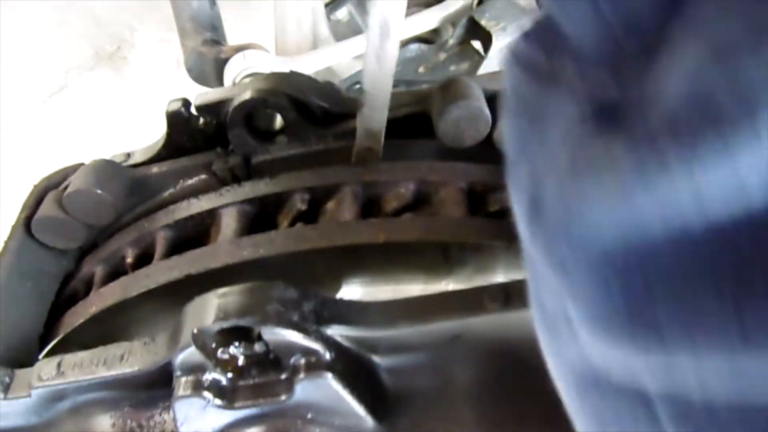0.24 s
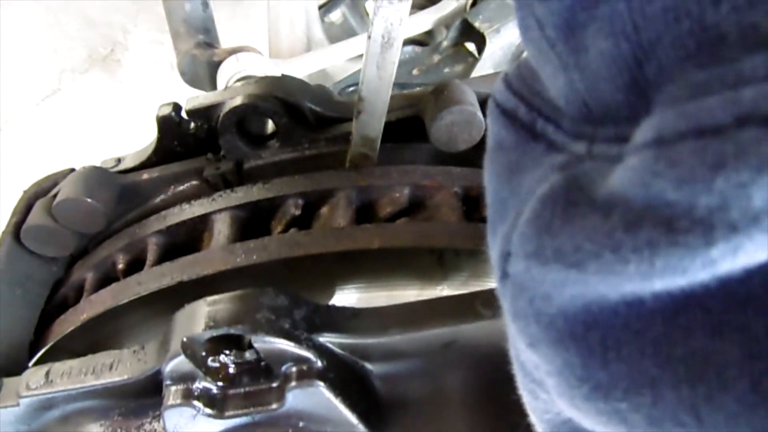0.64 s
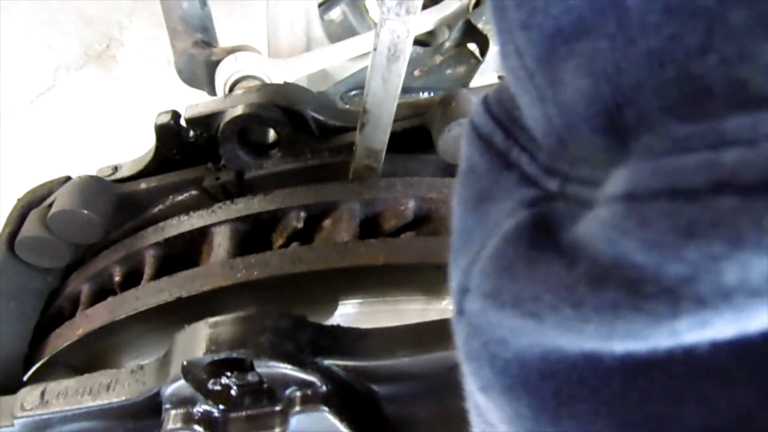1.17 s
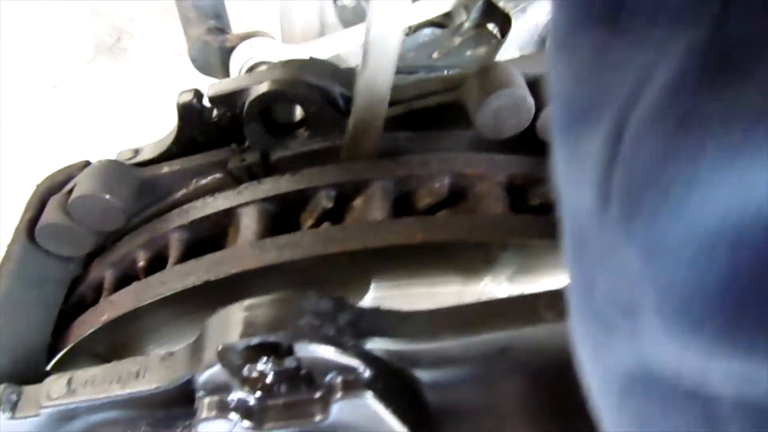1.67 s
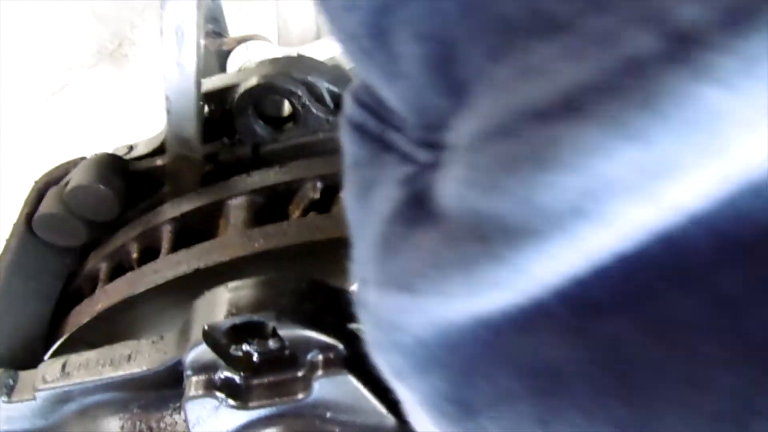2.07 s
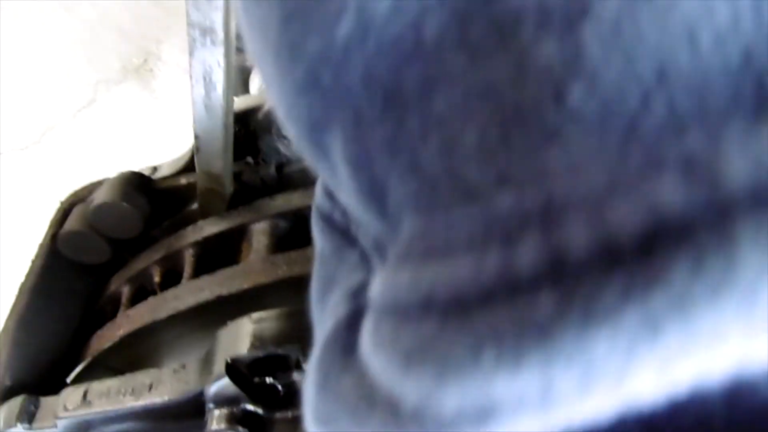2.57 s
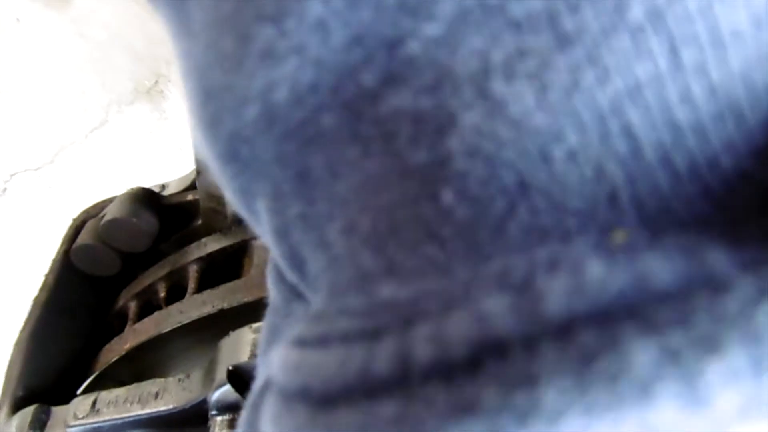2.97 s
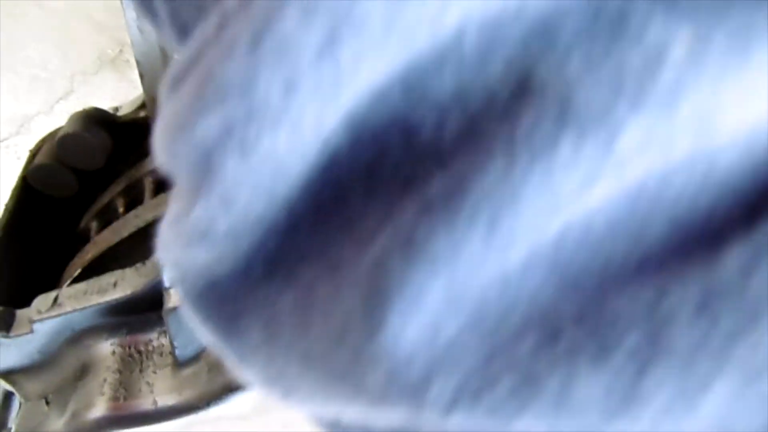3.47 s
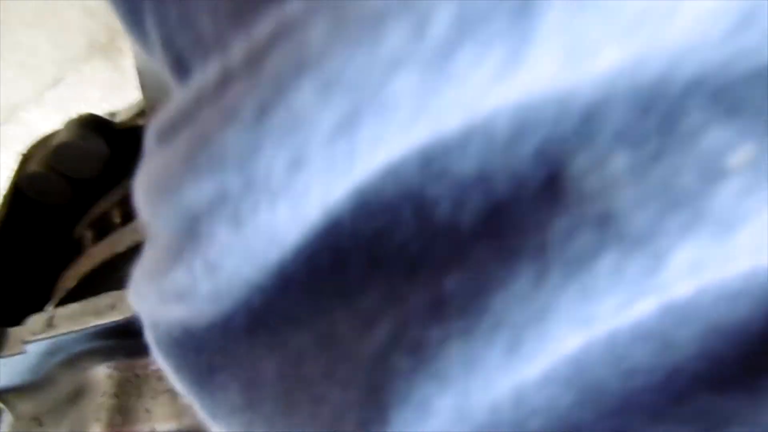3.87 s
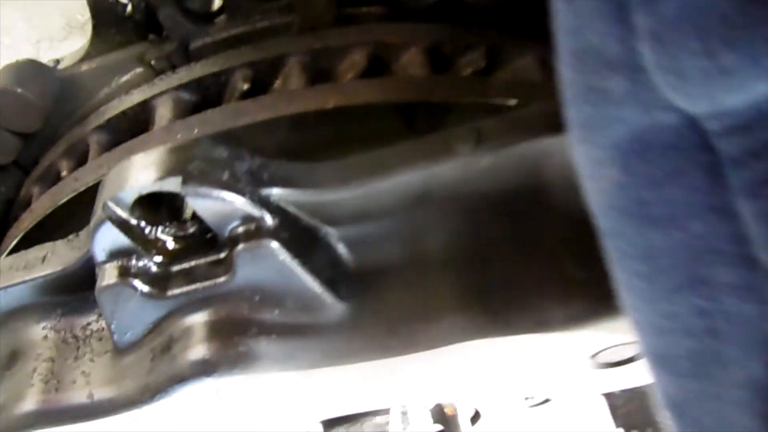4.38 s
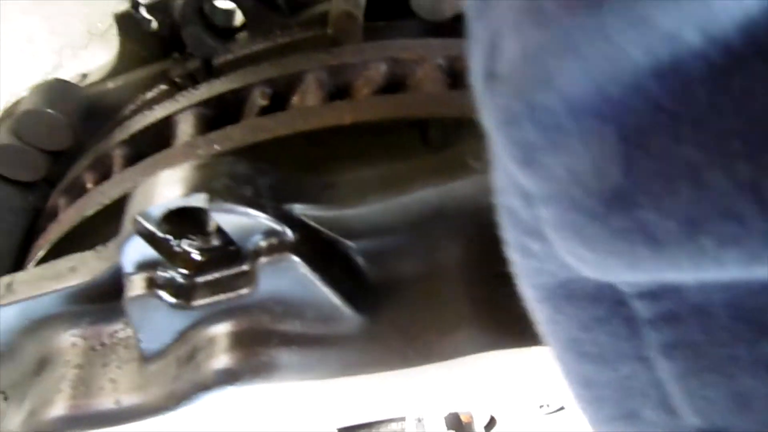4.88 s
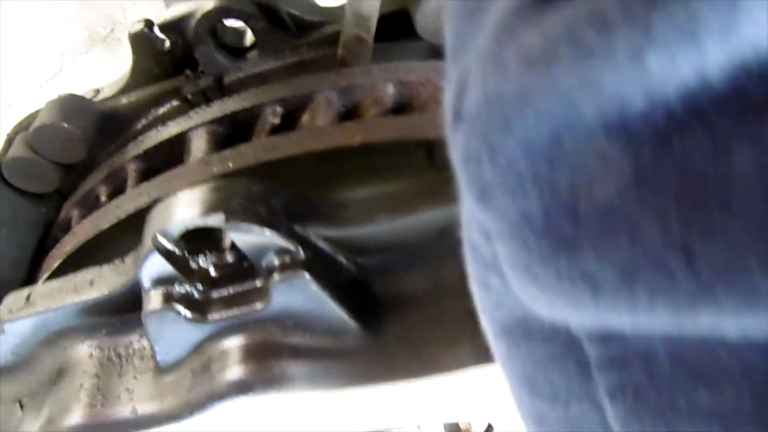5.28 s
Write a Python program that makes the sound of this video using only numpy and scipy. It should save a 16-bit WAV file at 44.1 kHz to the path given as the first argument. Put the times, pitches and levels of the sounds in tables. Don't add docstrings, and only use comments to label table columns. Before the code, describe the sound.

A steel tool knocks and scuffs on car brake iron in two bursts, some blows ringing briefly, with long quiet gaps of soft hiss.

```python
import sys
import numpy as np
from scipy import signal
from scipy.fft import rfft, irfft, next_fast_len
from scipy.io import wavfile
from scipy.ndimage import uniform_filter1d

SR = 44100
rng = np.random.default_rng(int(sys.argv[2]) if len(sys.argv) > 2 else 0)


def dump(signal):
    limited = np.clip(np.atleast_2d(signal).T, -1, 1)
    pcm = np.round(limited * 32767).astype(np.int16)
    wavfile.write(sys.argv[1], SR, pcm)


def natural_amplitude(level_db):
    exponent = np.asarray(level_db, float) / 20
    return 10 ** exponent


N = 244049

# pitch_hz, density_db
HISS_SPECTRUM = [(59, -33.5), (100, -1), (155, -7.5), (206, -6.5), (255, -8), (288, -5.5), (344, -10),
                 (638, -9), (1140, -9), (1230, -7.5), (1440, -13), (5700, -15), (6800, -17), (8840, -49.5),
                 (15000, -120)]
# pitch_hz, density_db
ROAD_SPECTRUM = [(8.8, -30.5), (15, 2), (32, -15), (53, -8.5), (69, -4), (118, -13.5), (140, -14),
                 (180, -46.5), (310, -120)]
# time_s, level_db
ROAD_SWELL = [(0.0, -59.5), (0.28, -66.5), (0.49, -66), (0.75, -68), (1.12, -65.5), (1.57, -66),
              (1.94, -61.5), (2.17, -65.5), (2.6, -68), (3.46, -70.5), (4.24, -69.5), (4.76, -70),
              (4.87, -74), (5.08, -72.5), (5.53, -67.5)]
# pitch_hz, width_hz, rms_db
FAR_MACHINE = (1240, 38, -79.5)

# start_s, peak_db, pitch_hz, t60_s
BUMPS = [(0.02, -37.5, 287, 0.13), (0.101, -39, 283, 0.14), (1.951, -49, 288, 0.25),
         (2.16, -41.5, 300, 0.11), (1.63, -52.5, 275, 0.28), (1.85, -48, 300, 0.27), (4.09, -49, 282, 0.26),
         (4.54, -45, 272, 0.11), (4.053, -48.5, 268, 0.17), (4.198, -53, 218, 0.26),
         (4.483, -45, 113, 0.25), (4.487, -41, 292, .1), (4.833, -45.5, 101.7, 0.27),
         (4.838, -43.5, 237.5, 0.11), (5.261, -44.5, 89.5, 0.092)]
# start_s, length_s, peak_db, pitch_hz
SQUEAKS = [
    (1.944, 0.036, -53, 6400),
    (4.813, 0.06, -59, 6780),
]

PART_HZ = {"held pad": 2485, "loose pad": 2362, "free pad": 2383, "shank": 3420, "blade": 3190, "spring":
           1710}
PART_T60_S = {"held pad": 0.027, "loose pad": 0.08, "free pad": .26, "shank": .028, "blade": 0.017,
              "spring": 0.0099}
# start_s, peak_db, part
PINGS = [(.469, -51, "held pad"), (1.632, -32, "loose pad"), (1.6495, -27.5, "loose pad"),
         (1.7387, -25.5, "shank"), (1.7387, -38, "spring"), (1.8131, -14.5, "shank"),
         (1.8133, -19.5, "held pad"), (1.8133, -14.5, "blade"), (1.8133, -33, "spring"),
         (1.822, -41, "loose pad"), (1.9133, -19, "shank"), (1.9133, -25, "held pad"),
         (1.929, -28, "loose pad"), (2.033, -41.5, "loose pad"), (2.048, -43.5, "loose pad"),
         (4.041, -30.5, "loose pad"), (4.042, -39, "shank"), (4.1875, -44, "held pad"),
         (4.248, -40, "held pad"), (4.436, -37, "shank"), (4.437, -40.5, "free pad"),
         (4.4825, -24, "blade"), (4.484, -48, "free pad")]
# start_s, peak_db, pitch_hz
FITTINGS = [(.024, -47, 700), (.096, -36.5, 2110), (4.586, -45, 730), (0.273, -55, 4050), (.272, -55, 4360),
            (.424, -47, 724), (.470, -54, 4000), (2.698, -57, 700), (2.698, -53, 2200), (4.189, -36, 3690),
            (4.19, -40, 5200), (4.252, -47, 5180), (4.437, -38.5, 870)]
FITTING_T60_S = .044

# pitch_hz, t60_s, offset_db against the family's share in SPOT_SHARES
DISC_MODES = [
    [(1927, 0.22, 2.5), (1560, .12, -22)],
    [(853.5, 0.3, -2), (267, 0.35, -20)],
    [(3061, 0.26, 2)],
    [(4086, 0.29, 3), (6586, .12, -7.5)],
    [(4380, .22, 5), (5397, 0.15, -5), (6022, 0.24, -18)],
]
SPOT_SHARES = {"face": (-1.5, -21, -12, -23, -28.5), "flange": (3.5, -17.5, -4.5, -21, -12),
               "rim": (-12, -16.5, 1.5, -27, -12), "hub": (-13.5, -3, -18, -3, -21),
               "vane": (-9, -2.5, -16.5, -26.5, -30), "edge": (-3.5, 0.5, -23, -25, -26)}
# start_s, peak_db, spot
DISC_BLOWS = [(.009, -48, "rim"), (.095, -40.5, "edge"), (1.630, -48, "rim"), (1.630, -48.5, "vane"),
              (1.649, -40.5, "rim"), (1.814, -34, "hub"), (1.913, -47.5, "hub"), (1.912, -47.5, "edge"),
              (1.930, -49, "hub"), (1.968, -49.5, "face"), (2.004, -49.5, "vane"), (2.029, -58.5, "edge"),
              (2.075, -52.5, "vane"), (2.133, -49, "vane"), (2.171, -59.5, "vane"), (4.041, -28.5, "face"),
              (4.051, -41, "face"), (4.059, -49.5, "face"), (4.129, -53.5, "vane"), (4.250, -54, "vane"),
              (4.251, -61, "rim"), (4.436, -34.5, "flange"), (4.451, -51, "face"), (4.483, -33, "edge"),
              (4.505, -64, "edge"), (4.536, -48.5, "vane")]
# start_s, length_s, extra_loss (multiple)
BLADE_RESTS = [
    (0.03, 0.014, 1.5),
    (0.095, 0.034, .8),
    (1.737, .012, 2.5),
    (1.843, .015, .6),
    (1.971, 0.028, 1.6),
    (4.066, 0.0075, 1.6),
    (4.2, .02, 1.5),
    (4.491, 0.036, 1.8),
]

# pitch_hz, level_db, relative_ring_length
CALIPER_MODES = [(497, -6, 2.9), (700, -1, 3.3), (970, 2.5, 0.65), (1065, -5.5, 1.5), (1467, 2, 0.57),
                 (1700, 0, 0.82), (1904, -2.5, 0.48), (2200, -8, 1.5), (2346, -2.5, 0.96),
                 (2600, -6.5, 1.1), (2900, -9, 0.65), (3200, -5, 1.2), (3616, 1, 0.75), (3800, -19, 1.1),
                 (4050, -4, 0.69), (4340, 3.5, 0.3), (4910, -2.5, 1.2), (5200, -3.5, 1.2), (5500, -6, .8),
                 (5940, -1, 0.78), (6290, -7, .9), (6760, -10, 0.36), (7100, -6, 0.23)]
# start_s, length_s, rms_db, centre_hz, spread_octaves
SCUFFS = [(0.064, 0.019, -47.5, 3240, 0.94), (0.086, 0.013, -42, 2200, 1.34),
          (0.265, 0.013, -60.5, 4520, 0.52), (0.432, 0.059, -66.5, 2500, 1.3),
          (0.878, 0.0079, -61.5, 2500, 1.8), (1.617, 0.045, -48, 2200, 1), (1.82, .021, -55, 2600, 1.1),
          (1.836, 0.089, -58, 2200, 1.1), (1.93, 0.076, -58, 2200, 1.3), (2.007, 0.073, -56, 2520, 0.99),
          (2.067, .092, -54.5, 2200, 1.25), (2.919, .03, -67, 3500, 0.91), (3.055, .023, -65, 1700, 0.43),
          (4.803, 0.033, -60, 3350, 0.94)]
# start_s, length_s, rms_db, centre_hz
RUBS = [(.008, 0.05, -51, 754), (0.081, 0.046, -55.5, 500), (1.651, 0.032, -51, 1300),
        (1.738, 0.036, -59.5, 580), (1.927, 0.062, -58, 470), (2.149, 0.024, -55.5, 910),
        (4.019, 0.011, -52.5, 890), (4.05, 0.028, -52, 1210), (4.101, .085, -60, 800),
        (4.184, .034, -54.5, 700), (4.26, 0.071, -70, 900), (4.445, 0.012, -50, 1010),
        (4.476, .025, -39.5, 734), (4.518, 0.019, -56, 700), (4.582, 0.034, -54.5, 800),
        (4.806, 0.033, -58, 790), (4.822, 0.055, -73, 385)]
RUB_OCTAVES = 1

# start_s, peak_db, centre_hz, spread_octaves
BLOWS = [
    (1.7386, -17, 2440, 0.68),
    (1.8131, -6, 2900, 0.71),
    (1.9134, -12, 2840, 0.77),
    (4.2475, -32.5, 2840, 0.29),
]
# start_s, peak_db, centre_hz, spread_octaves
SHOVES = [
    (0.0953, -27.5, 2500, .6),
    (1.6285, -37.5, 2150, 1),
    (1.6483, -22.5, 2230, 0.67),
    (4.041, -25.5, 2080, 0.59),
    (4.0498, -31.5, 2060, 0.76),
    (4.1877, -25, 3800, .85),
    (4.435, -21.5, 2190, 0.7),
    (4.4816, -22.5, 2010, 0.72),
]
# start_s, peak_db, centre_hz, spread_octaves
SNAPS = [
    (.0086, -23.5, 3200, 0.5),
    (2.5577, -34, 4400, 0.89),
]
# start_s, peak_db, centre_hz, spread_octaves
BOUNCES = [(.039, -38.5, 2000, .9), (1.824, -27.5, 2830, 1), (1.848, -20.5, 2270, .9),
           (1.8684, -28.5, 1890, .9), (1.929, -21, 2450, 0.72), (1.934, -31, 2470, .88),
           (1.9416, -41, 2330, .83), (2.0343, -35.5, 2010, 0.96), (2.0459, -33.5, 2020, .51),
           (2.1458, -33.5, 1540, 0.92), (2.1526, -34, 1430, 1), (4.252, -29.5, 3260, 1)]
# start_s, peak_db, centre_hz
TAPS = [
    (.234, -47.5, 1670),
    (.4242, -55, 870),
    (0.469, -46.5, 2740),
    (2.4396, -45, 2080),
    (2.6976, -47.5, 1870),
    (3.0527, -41, 2130),
    (4.019, -49, 1190),
    (4.6236, -41.5, 1900),
    (4.74, -41.5, 1990),
]
# start_s, peak_db, centre_hz
TIPS = [
    (.072, -36.5, 2900),
    (1.7387, -42.5, 6330),
    (1.756, -54, 6300),
    (1.8476, -38, 6400),
    (1.8676, -38.5, 6830),
    (1.912, -42, 7100),
    (2.147, -55, 5940),
    (4.1882, -29, 6670),
    (4.250, -40.5, 5200),
    (4.487, -40.5, 4750),
]
# start_s, peak_db, centre_hz
HEELS = [
    (.025, -34.5, 720),
    (.424, -53, 700),
    (4.4845, -32, 845),
    (4.5854, -38, 850),
    (4.6027, -48, 1027),
]
TAP_OCTAVES, TIP_OCTAVES, HEEL_OCTAVES = 0.94, 0.1, 0.6
# t60_s at 2 kHz, rattle_db
BLOW_KIND = (0.023, -8)
SHOVE_KIND = (0.022, -1.5)
SNAP_KIND = (0.0065, 0.41)
BOUNCE_KIND = (0.025, -3.5)
TAP_KIND = (0.03, -4.5)
TIP_KIND = (0.042, -8.5)
HEEL_KIND = (0.019, -3.3)
SOONER_PER_OCTAVE = 0.86


def level(x, db):
    return x * natural_amplitude(db) / np.sqrt(np.mean(x ** 2))


def add(out, start_s, x):
    i = int(start_s * SR)
    out[i:i + len(x)] += x[:N - i]


def fade(t, t60):
    return np.exp(-np.log(1000) * t / max(t60, .002))


def shaped(x, gain):
    n = next_fast_len(len(x), True)
    hz = np.fft.rfftfreq(n, 1 / SR) + 1
    return irfft(rfft(x, n) * gain(hz), n)[:len(x)]


def bell(hz, centre_hz, octaves):
    return np.exp(-.5 * (np.log2(hz / centre_hz) / max(octaves, .1)) ** 2)


def coloured(spectrum):
    hz, db = np.transpose(spectrum)
    return shaped(rng.standard_normal(N), lambda f: natural_amplitude(np.interp(np.log(f), np.log(hz), db)))


def walk(rate_hz):
    k = int(SR / rate_hz)
    smooth = uniform_filter1d(rng.standard_normal(N), k)
    return level(uniform_filter1d(smooth, k), 0)


def background():
    hiss = level(coloured(HISS_SPECTRUM), -63) * natural_amplitude(0.41 * walk(4.0))
    time_s, level_db = np.transpose(ROAD_SWELL)
    swell_db = np.interp(np.arange(N) / SR, time_s, level_db) + 0.39 * walk(3.7)
    road = level(coloured(ROAD_SPECTRUM), 0.44) * natural_amplitude(swell_db)
    hz, width_hz, machine_db = FAR_MACHINE
    hum = shaped(rng.standard_normal(N), lambda f: 1 / (1 + ((f - hz) / width_hz * 2) ** 2))
    return hiss + road + level(hum, machine_db) * natural_amplitude(2.0 * walk(1.1))


def bumps():
    out, t = np.zeros(N), np.arange(SR // 4) / SR
    for start_s, db, hz, t60 in BUMPS:
        ratios = np.array([.8, 1, 1.3]) * (1 + 0.11 * rng.standard_normal(3))
        wave = sum(np.sin(2 * np.pi * hz * r * t) for r in ratios)
        push = 1 - np.exp(-t / 0.014)
        add(out, start_s, natural_amplitude(db) / 2 * wave * push * fade(t, t60))
    return out


def squeaks():
    out = np.zeros(N)
    waver, flutter = walk(150), walk(120)
    for start_s, length_s, db, hz in SQUEAKS:
        n = int(length_s * SR)
        pitch_hz = hz * (1 + .006 * waver[:n])
        tone = np.sin(2 * np.pi * np.cumsum(pitch_hz) / SR)
        add(out, start_s, natural_amplitude(db + 4.2 * flutter[:n]) * np.hanning(n) ** 0.38 * tone)
    return out


def pings():
    out, t = np.zeros(N), np.arange(SR // 5) / SR
    parts = [(start_s, db, PART_HZ[part], PART_T60_S[part]) for start_s, db, part in PINGS]
    fittings = [row + (FITTING_T60_S,) for row in FITTINGS]
    for start_s, db, hz, t60 in parts + fittings:
        rise = 1 - np.exp(-t / 0.0007)
        add(out, start_s, natural_amplitude(db) * rise * fade(t, t60) * np.sin(2 * np.pi * hz * t))
    return out


def disc():
    out, loss = np.zeros(N), np.ones(N)
    for start_s, length_s, extra in BLADE_RESTS:
        add(loss, start_s, np.full(int(length_s * SR), extra))
    clock = np.cumsum(loss) / SR
    for start_s, db, spot in DISC_BLOWS:
        i = int(start_s * SR)
        age = clock[i:i + SR // 4] - clock[i]
        t = (i + np.arange(len(age))) / SR
        rise = 1 - np.exp(-age / 0.0026)
        for share_db, modes in zip(SPOT_SHARES[spot], DISC_MODES):
            for hz, t60, offset_db in modes:
                gain = natural_amplitude(db + share_db + offset_db)
                add(out, start_s, gain * rise * fade(age, t60) * np.sin(2 * np.pi * hz * t))
    return out


def disc_hum(grit):
    t = np.arange(SR // 5) / SR
    modes = sum(np.sin(2 * np.pi * hz * t) * fade(t, .55 * t60) for (hz, t60, _), *_ in DISC_MODES)
    return natural_amplitude(-51) * signal.fftconvolve(grit, modes)[:N]


def caliper(centre_hz, octaves, t60, detune=0.014, scatter_db=2.5):
    t = np.arange(4096) / SR
    hz, db, slower = np.transpose(CALIPER_MODES)
    hz = hz * (1 + detune * rng.standard_normal(len(hz)))
    gain = natural_amplitude(db + scatter_db * rng.standard_normal(len(hz)))
    ring = sum(g * np.sin(2 * np.pi * f * t) * fade(t, t60 * k) for f, g, k in zip(hz, gain, slower))
    return shaped(np.roll(ring, 200), lambda f: bell(f, centre_hz, octaves))


def scuffs():
    ticks_per_s, grain_db = 2500., 2.5
    out = np.zeros(N)
    for start_s, length_s, db, hz, octaves in SCUFFS + [row + (RUB_OCTAVES,) for row in RUBS]:
        n = int(length_s * SR)
        chance, size, grit = rng.random((3, 4096))[:, :n]
        ticks = (chance < ticks_per_s / SR) * natural_amplitude(-grain_db * np.log(size)) + .2 * (grit - .5)
        ticks *= np.sin(np.pi * (np.arange(n) / n) ** .9) ** .85
        body = caliper(hz, .55 * octaves, .024)
        body = body + .7 * caliper(hz, .7 * octaves, .008, detune=.1)
        sound = signal.fftconvolve(ticks, body)[200:]
        add(out, start_s, sound * natural_amplitude(db) / np.sqrt(np.mean(sound[:n] ** 2)))
    return out


def clinks():
    out, t = np.zeros(N), np.arange(2048) / SR

    def spread(rows, octaves):
        return [row + (octaves,) for row in rows]

    kinds = [(BLOW_KIND, BLOWS), (SHOVE_KIND, SHOVES), (SNAP_KIND, SNAPS), (BOUNCE_KIND, BOUNCES),
             (TAP_KIND, spread(TAPS, TAP_OCTAVES)), (TIP_KIND, spread(TIPS, TIP_OCTAVES)),
             (HEEL_KIND, spread(HEELS, HEEL_OCTAVES))]
    contacts = sorted(row + kind for kind, rows in kinds for row in rows)
    for start_s, db, hz, octaves, t60, rattle_db in contacts:
        t60 = t60 * SOONER_PER_OCTAVE ** np.log2(hz / 2000)
        force = natural_amplitude(rattle_db - 14.5) * rng.standard_normal(len(t)) * fade(t, t60)
        force[0] += 1
        ring = signal.fftconvolve(force, caliper(hz, octaves, 0.65 * t60))
        crack = shaped(np.roll(force, 200), lambda f: bell(f, 0.51 * hz, 2.8 * octaves))
        ring /= np.max(np.abs(ring))
        ring[:len(crack)] += natural_amplitude(-13.5) * crack / np.max(np.abs(crack))
        add(out, start_s - 210 / SR, ring * natural_amplitude(db) / np.max(np.abs(ring)))
    return out


def wheel_arch(metal):
    t = np.arange(SR // 5) / SR
    tail = shaped(rng.standard_normal(len(t)), lambda f: bell(f, 1200, 1.6))
    tail = tail * fade(t, 0.14) * (t > .003)
    return natural_amplitude(-18.0) * signal.fftconvolve(metal, tail / np.sqrt(np.sum(tail ** 2)))[:N]


def scene():
    grit = scuffs()
    metal = disc() + pings() + clinks() + grit + disc_hum(grit)
    return (metal + wheel_arch(metal) + bumps() + squeaks() + background())[None]


def roll_off(x):
    return signal.sosfilt(signal.butter(12, 8000, fs=SR, output="sos"), x)


def record(dry):
    top_hz = 7620
    steep = signal.cheby2(12, 64, top_hz * 1.119, fs=SR, output="sos")
    mix = signal.sosfilt(steep, dry)
    return roll_off(mix)


dry = scene()
out = record(dry)
dump(out)
```